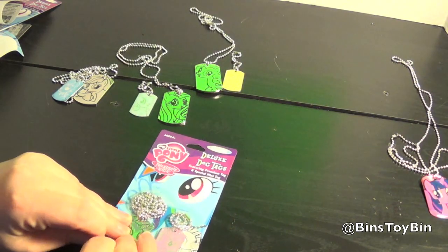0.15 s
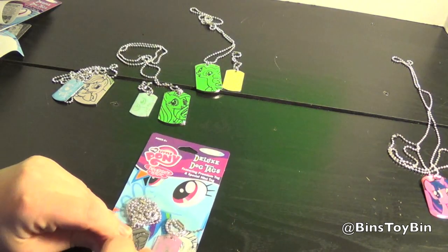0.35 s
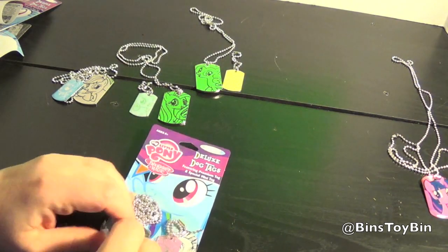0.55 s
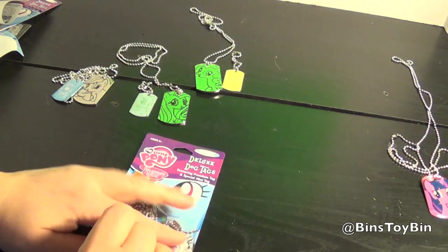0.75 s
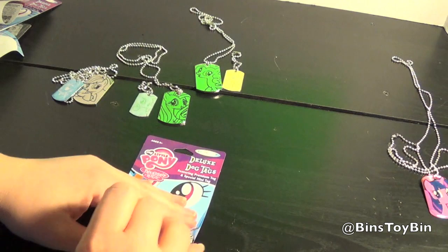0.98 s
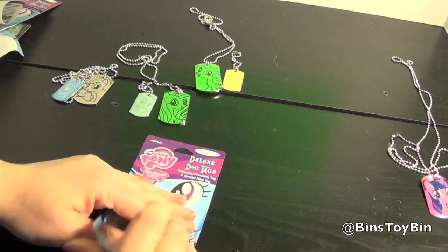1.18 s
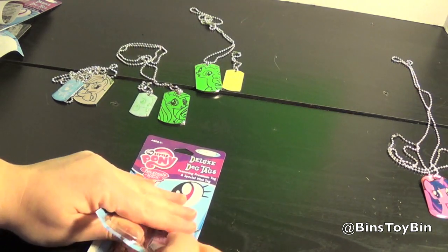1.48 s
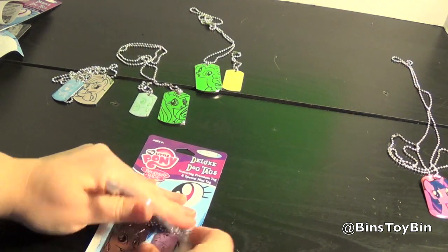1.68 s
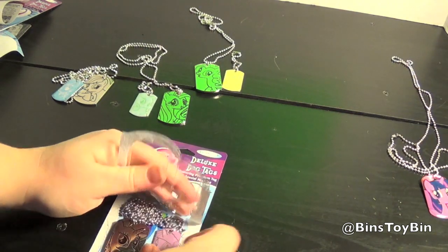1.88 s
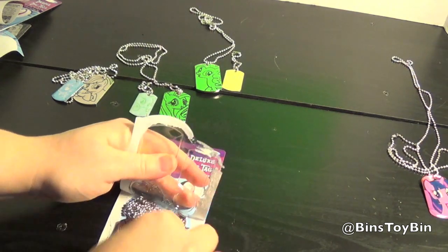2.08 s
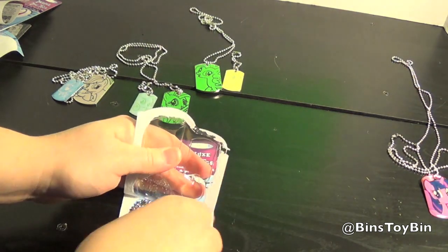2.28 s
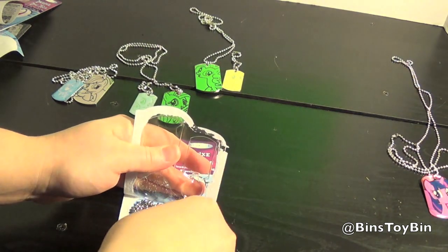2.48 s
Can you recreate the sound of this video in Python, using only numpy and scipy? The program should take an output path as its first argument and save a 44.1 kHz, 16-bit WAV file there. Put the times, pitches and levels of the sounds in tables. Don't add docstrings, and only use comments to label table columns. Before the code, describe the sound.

Stiff plastic packaging cracks, pops and tears close up, with a fine bead chain ticking inside

```python
import sys
import numpy as np
from scipy import signal
from scipy.fft import rfft, irfft, next_fast_len
from scipy.io import wavfile
from scipy.ndimage import uniform_filter1d, map_coordinates

SR = 44100
rng = np.random.default_rng(int(sys.argv[2]) if len(sys.argv) > 2 else 0)


def to_linear_factor(level_db):
    exponent = np.asarray(level_db, float) / 20
    return 10 ** exponent


def unload_wav(signal):
    wavfile.write(
        sys.argv[1],
        SR,
        np.round(np.clip(np.atleast_2d(signal).T, -1, 1) * 32767).astype(np.int16),
    )


N = 116865
TIME = np.arange(N) / SR

# pitch_hz, width_hz, level_db
WALLS = [(2510, 4540, -7.5), (3250, 1010, 2.5), (4480, 1470, -2.5), (6120, 1300, -2)]
# pitch_hz, width_hz, level_db
CARD = [(228, 330, -8.5), (450, 155, 2)]
CARD_DB = -13


def unit(x):
    return x / np.sqrt(np.mean(x ** 2) + 1e-20)


def along(points, hz):
    f, v = np.transpose(points)
    return np.interp(np.log(hz + 1), np.log(f + 1), v)


def filtered(x, response):
    m = next_fast_len(N + 8192)
    return irfft(rfft(x, m) * response(np.fft.rfftfreq(m, 1 / SR)), m)[..., :N]


def body(peaks):
    def shape(f):
        total = 0
        for k, (pitch_hz, width_hz, db) in enumerate(peaks):
            damping = 1j * f * width_hz
            total = total + (-1) ** k * to_linear_factor(db) * damping / (pitch_hz ** 2 - f * f + damping)
        return total

    def response(f):
        low_cut = 1j * f / (peaks[0][0] / 2 + 1j * f)
        return shape(f) * low_cut / np.sqrt(np.mean(abs(shape(f)) ** 2))

    return response


def dying(times, gains, t60):
    at = np.clip(np.round(np.asarray(times) * SR).astype(int), 0, N - 1)
    jumps = np.bincount(at, gains, N)
    return signal.lfilter([1], [1, -to_linear_factor(-60 / (abs(t60) * SR))], jumps)


def rings(rows, t60, attack):
    out, t = np.zeros(N + SR), np.arange(4000) / SR
    for s, db, hz in rows:
        a, b = rng.standard_normal(2)
        second_hz = hz * (1.17 + 0.079 * a)
        pair = np.sin(2 * np.pi * hz * t) + 0.26 * np.sin(2 * np.pi * second_hz * t + b)
        out[round(s * SR):][:len(t)] += to_linear_factor(db - 60 * t / t60) * (1 - np.exp(-t / attack)) * pair
    return out[:N]


def crackle(per_s, spread_db):
    draw = rng.random((6000, 2))
    times = np.cumsum(-np.log(draw[:, 0])) / per_s
    size = to_linear_factor(spread_db * np.minimum(-np.log(draw[:, 1]), 2))
    return unit(dying(times, size * (times < N / SR), .005))


def air():
    # pitch_hz, level_db
    air_colour = [(15, -34), (25, -2.5), (641, 1), (1190, -5), (3620, -48), (13200, -33), (16000, -6)]
    hum_hz, hum_db, air_db = 51, -63.5, -50.5
    mid, side = filtered(rng.standard_normal((2, N)), lambda hz: to_linear_factor(along(air_colour, hz)))
    hum = filtered(rng.standard_normal(N), lambda f: 1 / (1 + ((f - hum_hz) / 5) ** 2))
    scale = to_linear_factor(air_db) / np.std(mid)
    return scale * mid + to_linear_factor(hum_db) * unit(hum), scale * to_linear_factor(-19) * side


def rubbing():
    # start_s, level_db
    handling = [
        (0, -43.5),
        (.46, -42.5),
        (.9, -34),
        (1.1, -30),
        (1.23, -43),
        (1.5, -32.5),
        (1.9, -37),
        (2.38, -31),
        (2.46, -45),
        (2.65, -51.5),
    ]
    rub_db = np.interp(TIME, *np.transpose(handling))
    grain = 0.52 + 0.19 * crackle(900, spread_db=17.0)
    return [to_linear_factor(rub_db + part_db) * grain for part_db in (-3, -4, -8.0, -24)]


def crackle_runs():
    run_starts = [.085, .24, .271, .311, .49, .605, .676, .722, .79, .855, .93, .992, 1.01, 1.144, 1.18,
                  1.257, 1.31, 1.63, 1.722, 1.785, 1.83, 1.948, 2.13, 2.232, 2.334, 2.61, 1.98, 2.01, 1.273]
    # length_s, level_db, hollow_db, rim_db
    run_shapes = [(0.03, -35.5, -13, 5.5), (0.014, -19, -6.5, 4.5), (0.038, -12, -10, -2),
                  (0.014, -20.5, -13, -27), (0.031, -25.5, -12, -29), (0.027, -28, -3, 0),
                  (0.012, -24, -25, -2.5), (0.028, -12, -13, -2.5), (0.072, -23.5, -4.5, -23),
                  (0.035, -21.5, -7.5, -2), (0.058, -40, -16, 3), (0.0081, -16.5, -12, -6.5),
                  (0.054, -30, -39, 2), (0.019, -22, -27, 4), (0.011, -25.5, -27, -7),
                  (0.017, -24, 0.5, -5), (0.012, -19.5, -15, -3), (0.055, -13, -10.5, -6),
                  (0.047, -20, -1.5, 1), (0.026, -19, -9, 3), (0.045, -30.5, -33, 7.5),
                  (0.012, -21, -27, -7), (0.0047, -40.5, 7.5, 18), (0.02, -24.5, -39, -0.5),
                  (0.036, -18.5, -16, -1), (0.046, -43, -3, 9), (0.0075, -15, -9, -0.5),
                  (0.004, -30, -16, 11), (0.0027, -16, -3, -6)]
    per_s, spread_db, release_s = 600, 9, 0.056
    runs = np.zeros((4, N))
    for start, (length, db, hollow_db, rim_db) in zip(run_starts, run_shapes):
        rise = np.clip((TIME - start) / .0025, 0, 1)
        fall = to_linear_factor(-60 * np.clip(TIME - start - length, 0, None) / release_s)
        for k, part_db in enumerate((0, rim_db, hollow_db, hollow_db + CARD_DB)):
            runs[k] += to_linear_factor(db - 4 + part_db) * rise * fall
    common = crackle(per_s, spread_db)
    for k in range(4):
        grain = .6 * common + .4 * crackle(per_s, spread_db)
        runs[k] *= 0.22 + 0.39 * grain
    return runs


def ticks(k):
    # start_s, walls_db, rim_db
    tick_table = [(0.2489, -22, -15), (0.2716, -16, -19), (0.2769, -15, -15), (0.2948, -15, -14),
                  (0.3032, -14, -17), (0.3237, -16, -24), (0.3273, -21, -21), (0.335, -26, -22),
                  (0.5584, -31, -27), (0.6092, -26, -20), (0.6184, -22, -22), (0.6235, -21, -21),
                  (0.6779, -25, -31), (0.7004, -26, -26), (0.737, -14, -18), (0.754, -15, -21),
                  (0.7589, -15, -19), (0.7653, -19, -20), (0.803, -22, -19), (0.8228, -28, -17),
                  (0.8962, -23, -20), (0.9638, -23, -22), (0.9948, -21, -18), (0.9993, -15, -15),
                  (1.0552, -24, -22), (1.1002, -30, -25), (1.1547, -14, -17), (1.1668, -18, -22),
                  (1.259, -25, -27), (1.6856, -19, -17), (1.7376, -16, -15), (1.7521, -23, -14),
                  (1.7666, -16, -16), (1.7769, -21, -15), (1.7924, -19, -15), (1.8251, -27, -18),
                  (1.8331, -24, -20), (1.9014, -19, -21), (1.9211, -33, -25), (1.9918, -25, -16),
                  (2.0845, -32, -26), (2.1013, -34, -24), (2.1061, -32, -24), (2.123, -35, -25),
                  (2.1299, -29, -21), (2.1982, -34, -23), (2.2084, -31, -30), (2.2333, -33, -19),
                  (2.2885, -32, -22), (2.2956, -28, -19), (2.3249, -20, -18), (2.3417, -16, -16),
                  (2.3483, -19, -14), (2.3685, -34, -20)]
    start, *part_db = np.transpose(tick_table)
    gain = to_linear_factor(part_db[k] + (-6.5, -4.5)[k])
    spike = dying(start + .0003, gain * to_linear_factor(1.5), .0002)
    return dying(start, gain, 0.013), spike


def snaps(k):
    # start_s, walls_db, rim_db
    snap_table = [(0.2594, -14, -15), (0.3631, -16, -8), (0.4759, -19, -12), (0.4877, -14, -14),
                  (0.5155, -24, -21), (0.5376, -12, -21), (0.5831, -24, -26), (0.5961, -16, -14),
                  (0.6023, -12, -18), (0.7864, -21, -11), (0.8161, -23, -14), (0.8294, -21, -13),
                  (0.8406, -23, -11), (0.8445, -19, -14), (0.8478, -22, -10), (0.8832, -22, -15),
                  (0.9293, -13, -18), (0.9459, -15, -15), (0.9718, -14, -13), (1.1472, -13, -18),
                  (1.1836, -17, -20), (1.2788, -16, -19), (1.3138, -21, -22), (1.404, -16, -14),
                  (1.5415, -16, -26), (1.63, -15, -12), (1.7189, -22, -15), (1.7318, -22, -14),
                  (1.7564, -18, -12), (1.7711, -19, -12), (1.7804, -23, -11), (1.8111, -19, -11),
                  (1.8585, -19, -15), (1.8855, -16, -12), (1.8973, -15, -15), (1.9334, -18, -12),
                  (1.9634, -22, -9), (1.9693, -15, -14), (2.0302, -10, -13), (2.0325, -15, -16),
                  (2.0493, -13, -15), (2.1391, -10, -16), (2.153, -14, -20), (2.1602, -13, -13),
                  (2.1808, -30, -22), (2.195, -25, -23), (2.2206, -17, -21), (2.2461, -12, -20),
                  (2.2627, -19, -16), (2.2761, -25, -14), (2.3, -32, -17), (2.3333, -19, -10),
                  (2.4765, -26, -18)]
    start, *part_db = np.transpose(snap_table)
    gain = to_linear_factor(part_db[k] + (-1, 1)[k])
    first = dying(start, gain, (.007, .005)[k])
    table_slap = dying(start + .003, gain * to_linear_factor(-14), .016)
    after = dying(start, gain * to_linear_factor(-28.5), 0.087)
    spike = -dying(start, gain * to_linear_factor(9), .0002)
    return first + table_slap + after, spike


def pops():
    # start_s, level_db, pitch_hz
    pop_table = [(0.4775, -25.5, 2200), (.488, -29, 2100), (.521, -24.5, 1500), (0.538, -17, 1400),
                 (0.581, -24.5, 1920), (0.602, -22, 1530), (0.677, -24, 990), (0.93, -16.5, 1270),
                 (0.942, -18.5, 1420), (0.998, -14.5, 2070), (1.146, -15.5, 1410), (1.158, -11.5, 1280),
                 (1.182, -17, 1260), (1.188, -18, 1360), (1.259, -23, 1450), (1.276, -15.5, 1350),
                 (1.311, -21, 1480), (1.4033, -12.5, 1222), (1.4025, -16.5, 2140), (1.404, -18.5, 2610),
                 (1.541, -11.5, 1290), (1.54, -16.5, 2080), (1.541, -18, 2550), (1.654, -23, 1410),
                 (1.661, -20, 1360), (1.98, -33, 1100)]
    start, db, _ = np.transpose(pop_table)
    rattle = [dying(start, to_linear_factor(db - 11.5 + part_db), 0.03) for part_db in (0, CARD_DB)]
    return rings(pop_table, t60=0.013, attack=0.00037) * to_linear_factor(4.5), rattle


def flexed(x):
    z = signal.stft(x, nperseg=128)[2]
    field = uniform_filter1d(rng.standard_normal(z.shape), size=4, axis=0)
    field = uniform_filter1d(field, size=6, axis=1)
    gain = to_linear_factor(2.4 * unit(field))
    return signal.istft(z * unit(gain), nperseg=128)[1][:N]


def shell():
    # pitch_hz, width_hz, level_db
    rim = [(8210, 2590, -2.5), (11000, 2320, -1), (14900, 3100, -16)]
    # pitch_hz, width_hz, level_db
    hollow = [(980, 260, -6), (1330, 300, 0), (2150, 450, -6)]
    rub, runs = rubbing(), crackle_runs()
    pop_ring, rattle = pops()
    noise = rng.standard_normal(N)
    parts = np.zeros(N)
    for k, peaks in enumerate((WALLS, rim, hollow, CARD)):
        rough, spikes = runs[k] + rub[k], 0
        if k < 2:
            tick, tick_spike = ticks(k)
            snap, snap_spike = snaps(k)
            rough = rough + tick + snap
            spikes = tick_spike + snap_spike
        else:
            rough = rough + rattle[k - 2]
        parts = parts + filtered(rough * noise + spikes, body(peaks))
    return pop_ring + flexed(parts)


def chain(shaken):
    count, length = 700, 700
    draw, t = rng.standard_normal((count, 3)), np.arange(length) / SR
    at = (rng.random(count) * (N - length)).astype(int)
    size = uniform_filter1d(abs(shaken), 1500)[at] * to_linear_factor(-22 + 6 * draw[:, 0])
    hz = np.clip(10700 * np.exp(.1 * draw[:, 1:2]), 0, 13000)
    tick = size[:, None] * np.sin(2 * np.pi * hz * t) * to_linear_factor(-60 * t / 0.036)
    return np.bincount((at[:, None] + np.arange(length)).ravel(), tick.ravel(), N)


def thumps():
    # start_s, level_db, pitch_hz
    thump_table = [
        (0.296, -25.5, 536),
        (1.148, -28.5, 220),
        (1.407, -36, 295),
        (1.673, -52, 475),
        (1.739, -30.5, 320),
        (1.9811, -28.5, 375),
        (2.0094, -29.5, 270),
        (2.235, -36, 343),
    ]
    s, db, _ = np.transpose(thump_table)
    scrape = filtered(dying(s, to_linear_factor(db - 8.5), 0.075) * rng.standard_normal(N), body(CARD))
    return rings(thump_table, t60=.04, attack=.002) + scrape


def creak():
    start_s, end_s = 1.553, 1.626
    first_per_s, last_per_s = 270, 125
    u = np.clip((TIME - start_s) / (end_s - start_s), 0, 1)
    rate = (first_per_s + (last_per_s - first_per_s) * np.sqrt(u)) * (u > 0) * (u < 1)
    count = np.cumsum(rate) / SR
    slips = np.diff(np.floor(count), prepend=0) * to_linear_factor(11.0 * u + rng.normal(0, 2.6, N))
    hollow_ring = body([(1310, 330, 0)])
    ring = filtered(filtered(slips, hollow_ring), hollow_ring)
    rasp = filtered(dying(TIME, slips, 0.02) * rng.standard_normal(N), body(WALLS[:2]))
    return to_linear_factor(-26.5) * (ring + to_linear_factor(-11) * rasp)


def clinks():
    # start_s, level_db, pitch_hz
    clink_table = [
        (1.957, -5, 11600),
        (1.969, -22, 11900),
    ]
    return rings(clink_table, t60=0.016, attack=0.00091)


def room(x):
    # pitch_hz, t60_s
    ring_times = [(300, 0.28), (2000, 0.13), (10000, 0.14)]
    # pitch_hz, level_db
    side_colour = [(100, -17), (700, -1.5), (5000, -3.5), (10000, -32)]
    out, step, delay = np.zeros((2, N + SR)), SR // 5, 130
    for a in range(0, N, step):
        hz, t, z = signal.stft(rng.standard_normal((2, SR // 3)), SR, nperseg=256)
        fade = to_linear_factor(-60 * t / along(ring_times, hz)[:, None])
        tail = signal.istft(z * fade, SR, nperseg=256)[1]
        wet = signal.fftconvolve(x[None, a:a + step], tail / np.linalg.norm(tail[0]), axes=1)
        out[:, a + delay:a + delay + wet.shape[1]] += wet
    return out[0, :N], filtered(out[1, :N], lambda hz: to_linear_factor(along(side_colour, hz)))


def scene():
    pack = shell()
    pack = pack + chain(pack) + thumps() + creak() + clinks()
    mid, side = room(pack)
    bed, bed_side = air()
    room_gain = to_linear_factor(-8.5)
    sway = .02 + .09 * map_coordinates(rng.standard_normal(400), [TIME * 120])
    m = pack + room_gain * mid + bed
    s = sway * pack + room_gain * side + bed_side
    return np.array([m + s, m - s])


def low_pass(x):
    return signal.sosfilt(signal.butter(12, 16980, fs=SR, output="sos"), x)


def record(dry):
    limited = dry / (1 + (dry / .75) ** 4) ** (1 / 4)

    def band(hz):
        return 1j * hz / (35 + 1j * hz) / (1 + (hz / 16000) ** 120)

    return low_pass(filtered(limited, band))


dry = scene()
out = record(dry)
unload_wav(out)
```